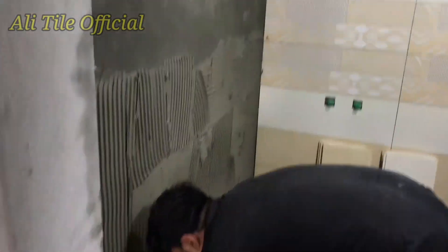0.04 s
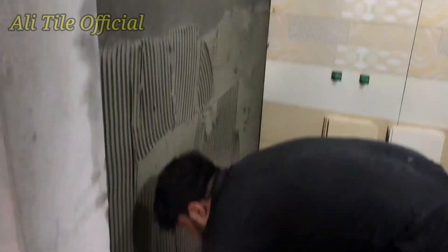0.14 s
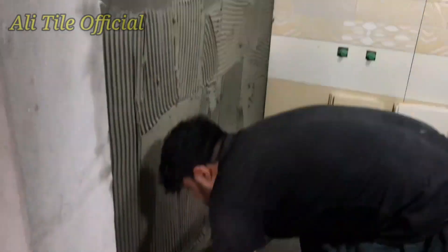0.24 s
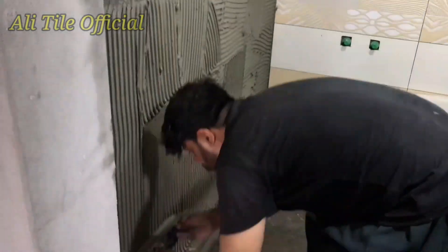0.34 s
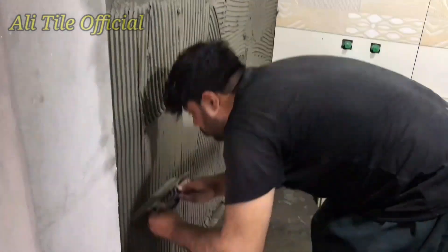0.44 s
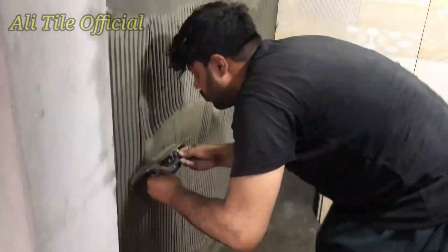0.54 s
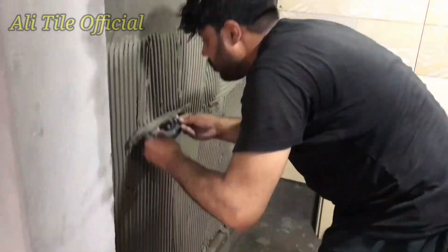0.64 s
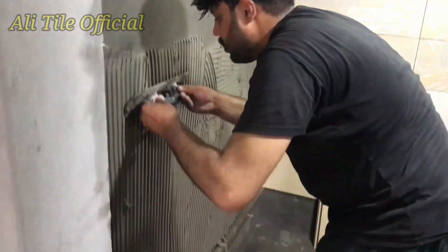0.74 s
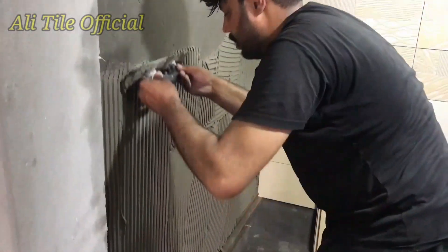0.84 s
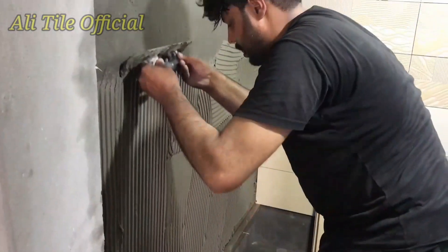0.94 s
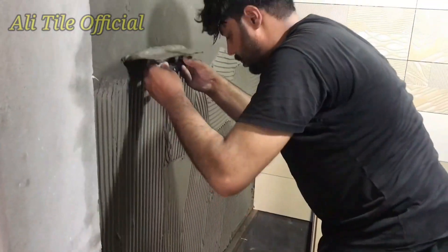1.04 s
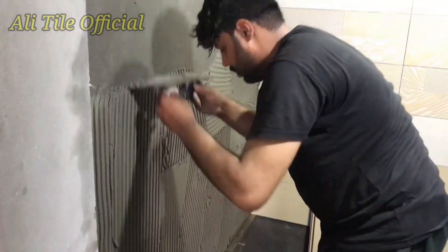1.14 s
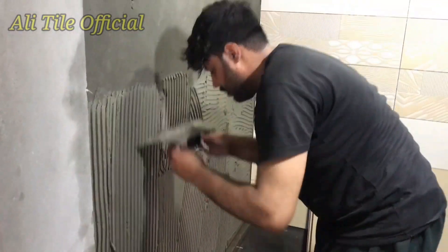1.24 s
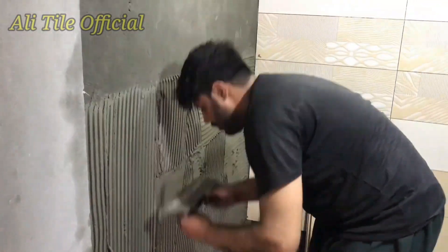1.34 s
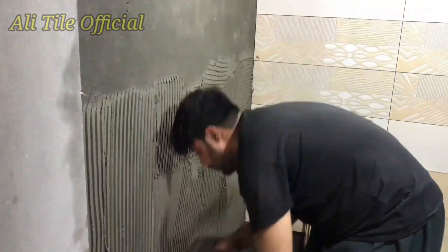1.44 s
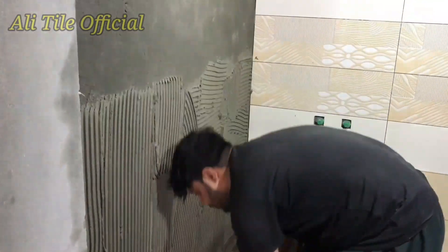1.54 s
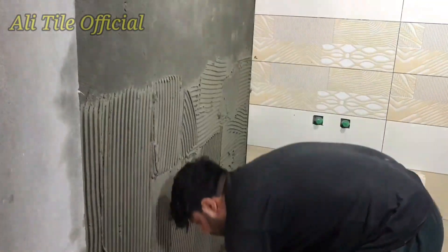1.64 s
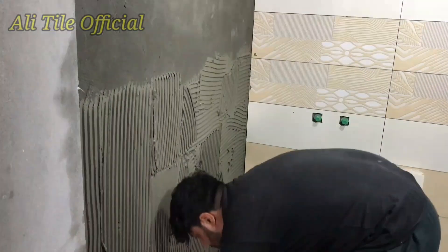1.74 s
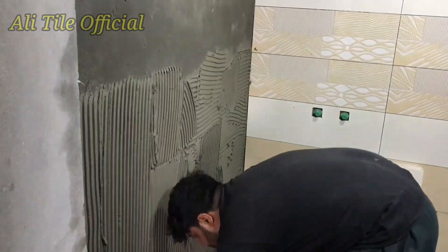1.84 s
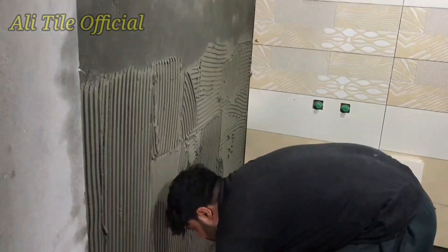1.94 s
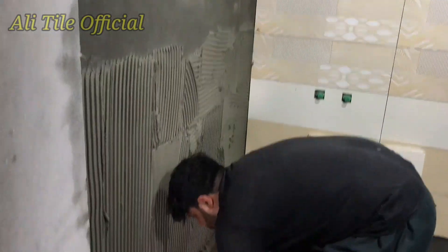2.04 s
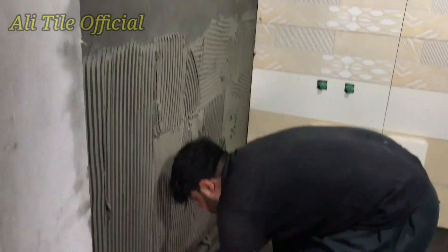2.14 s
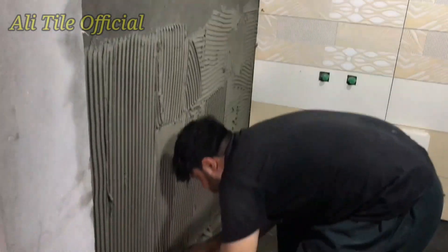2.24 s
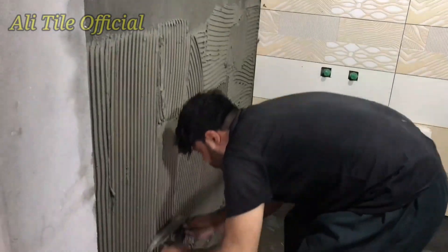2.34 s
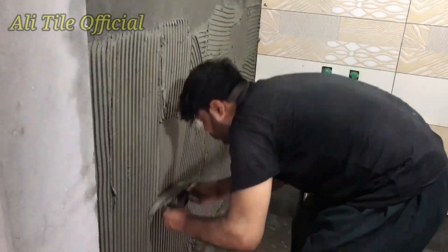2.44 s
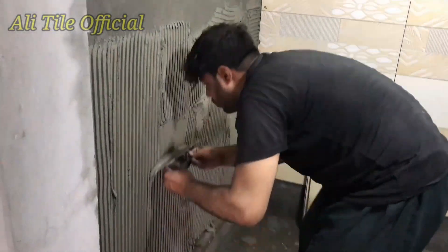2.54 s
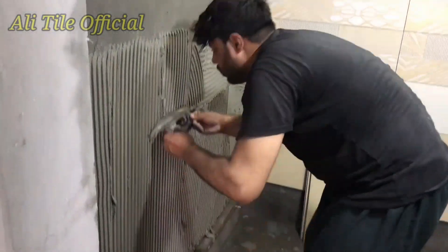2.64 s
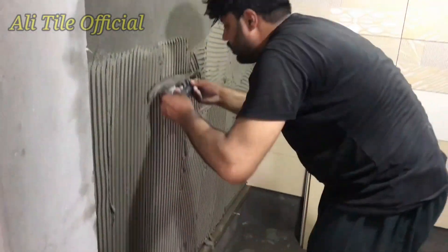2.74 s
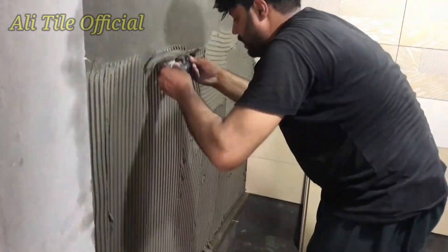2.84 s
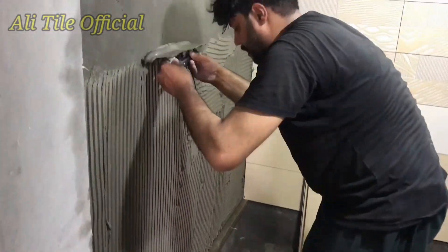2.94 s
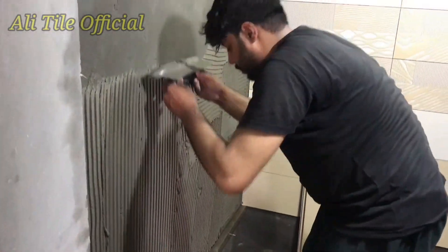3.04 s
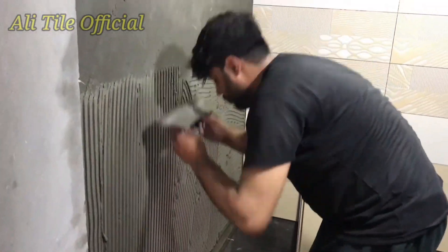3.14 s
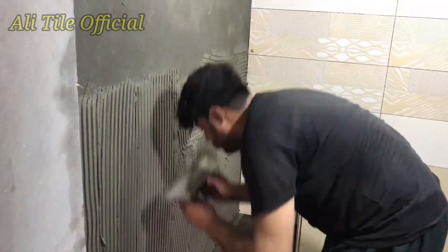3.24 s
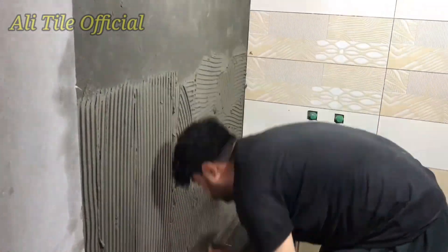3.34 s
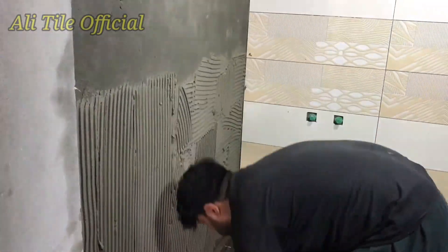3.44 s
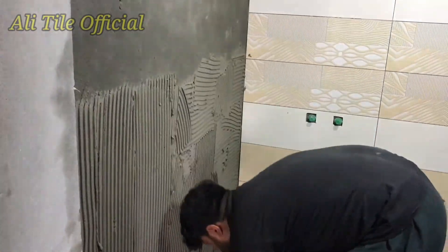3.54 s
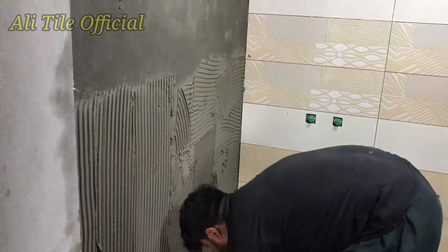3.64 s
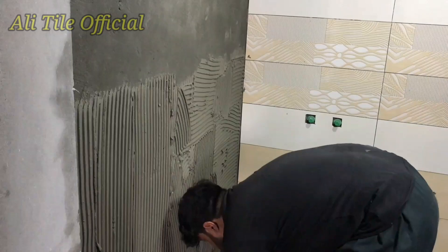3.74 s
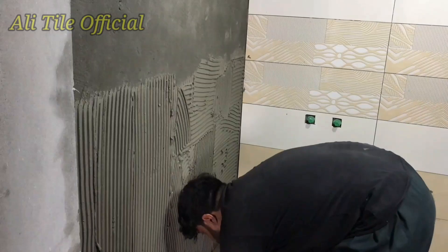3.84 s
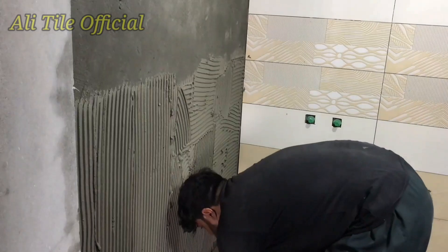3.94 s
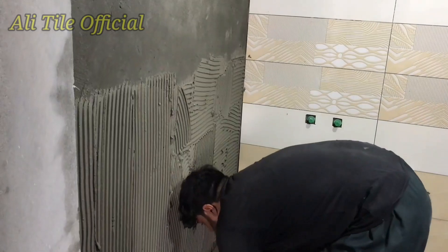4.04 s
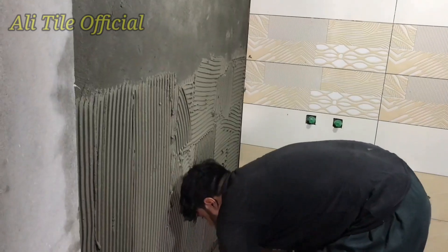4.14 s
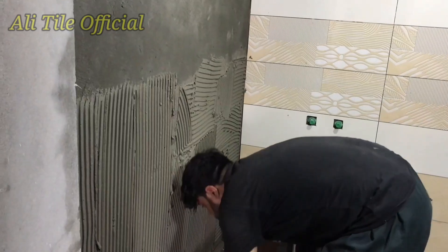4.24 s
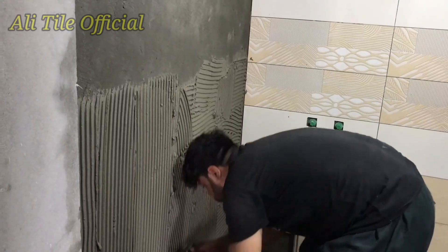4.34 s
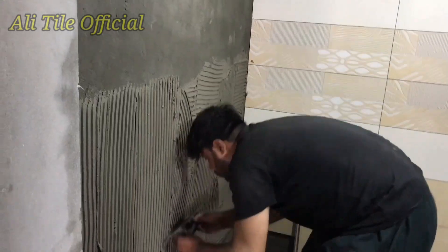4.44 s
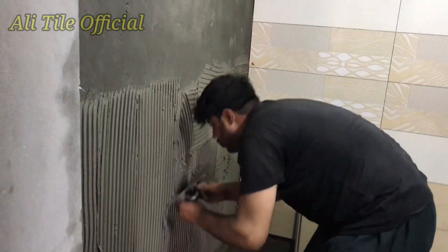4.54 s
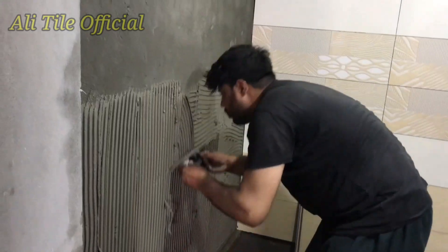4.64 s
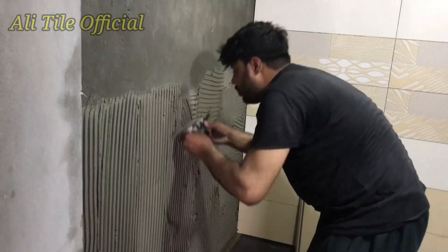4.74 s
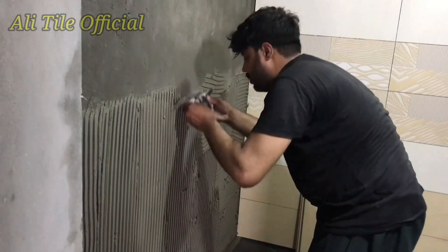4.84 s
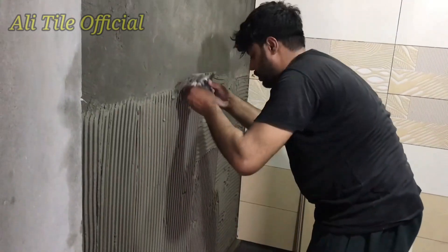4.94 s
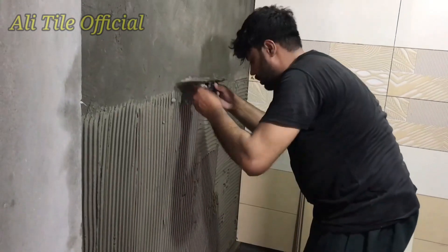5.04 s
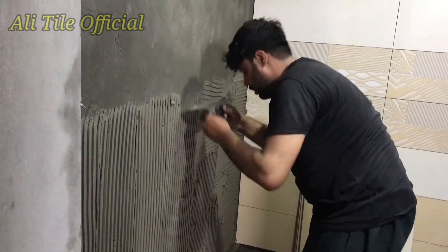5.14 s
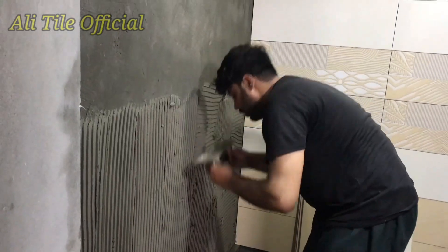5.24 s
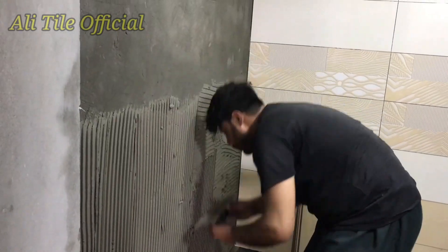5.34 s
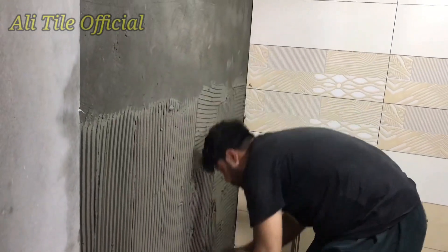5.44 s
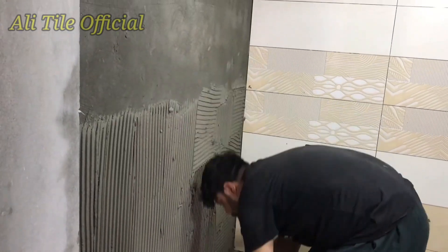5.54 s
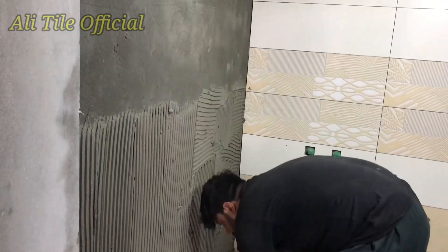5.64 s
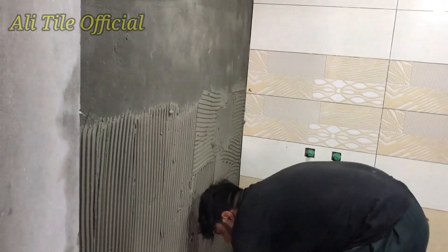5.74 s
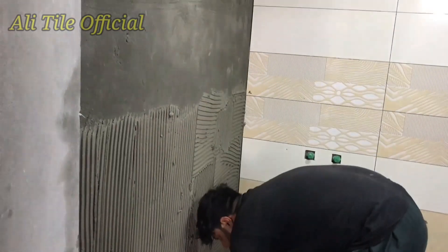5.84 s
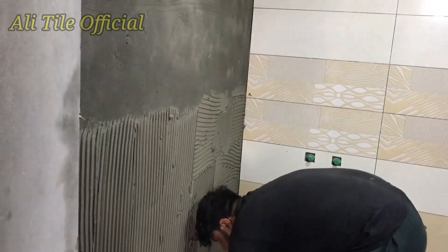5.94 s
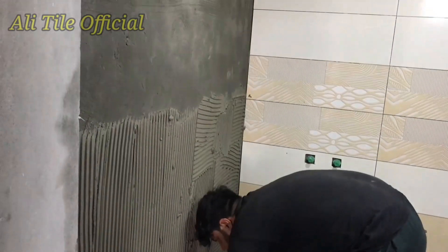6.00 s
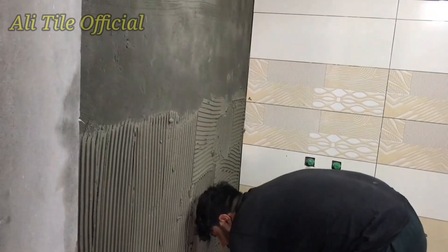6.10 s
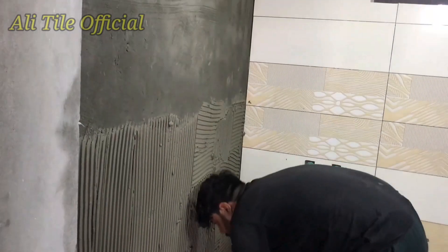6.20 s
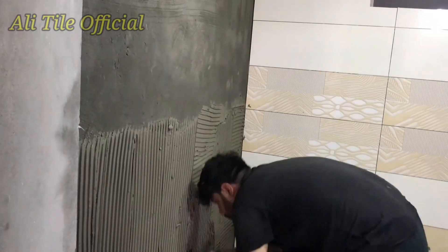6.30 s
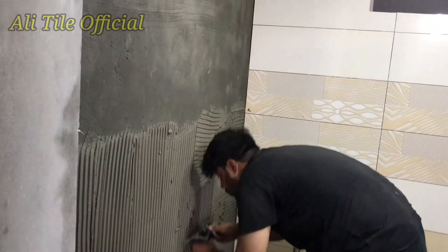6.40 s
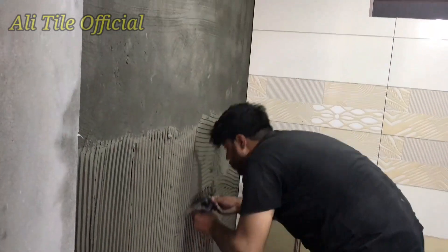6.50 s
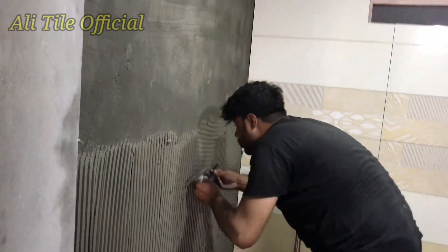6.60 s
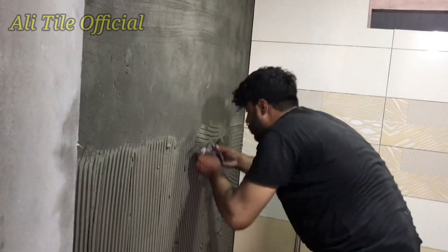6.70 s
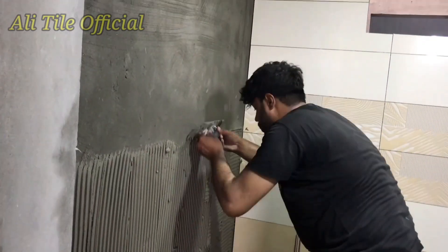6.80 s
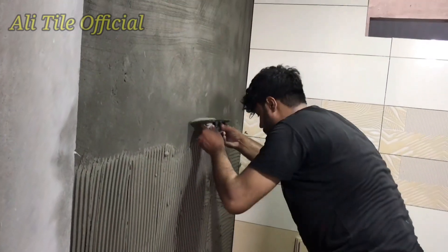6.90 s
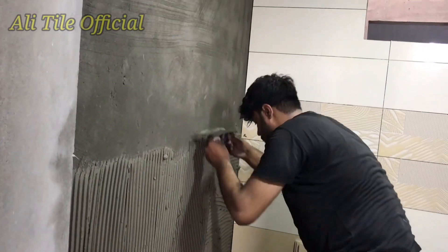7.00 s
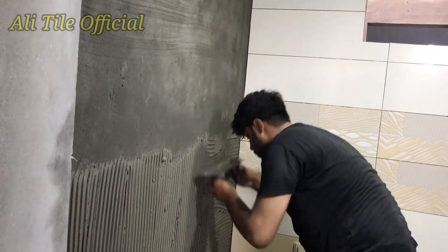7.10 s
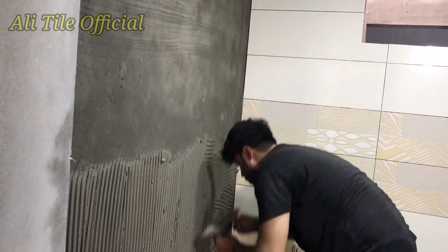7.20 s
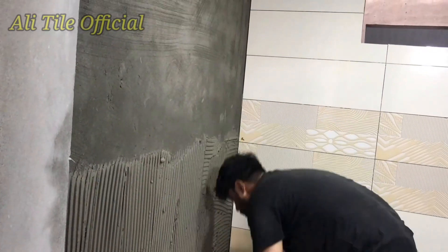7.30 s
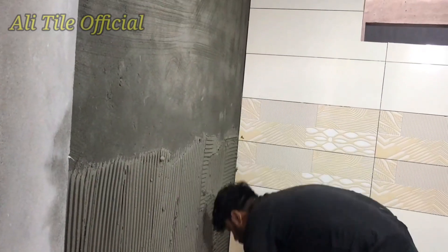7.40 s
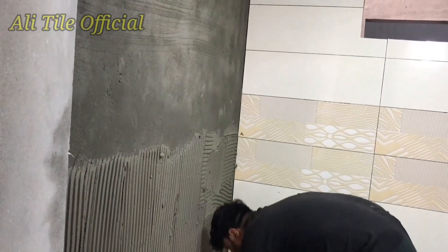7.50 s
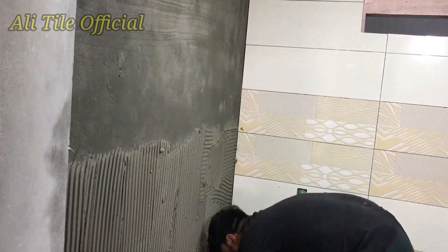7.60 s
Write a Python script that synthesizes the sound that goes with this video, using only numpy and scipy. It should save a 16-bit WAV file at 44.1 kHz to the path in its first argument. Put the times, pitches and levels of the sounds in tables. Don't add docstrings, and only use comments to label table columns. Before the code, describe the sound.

In a bare, echoing tiled bathroom, a notched steel trowel combs gritty adhesive up a cement wall in four strokes, each a damped rumble with sandy rasp and hiss. Between them the freed blade is scraped with a brief metallic ring, and steel and a hollow bucket are knocked, loudest midway. A low machine drone wavers through the walls behind faint room noise. One fairly close microphone, mono.

```python
import sys
import numpy as np
from scipy import signal
from scipy.fft import rfft, irfft, next_fast_len
from scipy.io import wavfile

SR = 44100
rng = np.random.default_rng(int(sys.argv[2]) if len(sys.argv) > 2 else 0)


def linear_from_db(decibels):
    return 10 ** (np.asarray(decibels, float) / 20)


def bounce(signal):
    frames = np.transpose(np.atleast_2d(signal))
    limited = np.clip(frames, -1, 1)
    pcm = np.round(limited * 32767).astype(np.int16)
    wavfile.write(sys.argv[1], SR, pcm)


N = 337805

# frequency [Hz], level [dB per Hz].
GRIT_SPECTRUM = [(150, -55), (250, -11.5), (318, -9.5), (481, -10.5), (680, 2), (943, -2.5), (1200, 0.5),
                 (2270, -4), (3440, -7.5), (4940, -13), (5970, -15.5), (7590, -18.5), (10400, -17.5),
                 (14400, -16.5), (15400, -30)]


def at_hz(points, hz):
    table_hz, values = np.array(points).T[:2]
    return np.interp(np.log(hz), np.log(table_hz), values)


def rms_one(x):
    return x / np.sqrt(np.mean(x ** 2) + 1e-20)


def in_time(rows):
    s, *columns = np.transpose(rows)
    return np.array([np.interp(np.arange(N) / SR, s, c) for c in columns])


def contact(tables, touch_s, lift_s, count):
    out, t = 0, np.arange(N) / SR
    for rows in tables:
        first_db, *rest_db = in_time(rows)[:count]
        touch = np.clip((t - rows[0][0]) / touch_s, 0, 1)
        lift = np.exp(-np.maximum(t - rows[-1][0], 0) / lift_s)
        levels_db = np.array([first_db] + [first_db + r for r in rest_db])
        out = out + touch * lift * linear_from_db(levels_db)
    return out


def band(x, low_hz, high_hz, order=2):
    edges_hz = [low_hz, min(high_hz, 0.49 * SR)]
    return signal.sosfilt(signal.butter(order, edges_hz, "band", fs=SR, output="sos"), x)


def coloured(x, spectrum):
    size = next_fast_len(len(x))
    hz = np.minimum(np.arange(size // 2 + 1) * SR / size + 1, 14500)
    shaped = rfft(x, size) * linear_from_db(at_hz(spectrum, hz))
    return rms_one(irfft(shaped, size)[:len(x)])


def resonance(x, hz, width_hz):
    r = np.exp(-np.pi * width_hz / SR)
    poles = [1, -2 * r * np.cos(2 * np.pi * hz / SR), r * r]
    return signal.lfilter([(1 - r * r) / 2, 0, (r * r - 1) / 2], poles, x)


def bending(x, hz, sharpness):
    out, state = np.zeros(N), np.zeros(2)
    for i in range(0, N, 256):
        r = np.exp(-np.pi * hz[i] / sharpness / SR)
        zeros = [(1 - r * r) / 2, 0, (r * r - 1) / 2]
        poles = [1, -2 * r * np.cos(2 * np.pi * hz[i] / SR), r * r]
        out[i:i + 256], state = signal.lfilter(zeros, poles, x[i:i + 256], zi=state)
    return rms_one(out)


def drift(rate_hz):
    slow = band(rng.standard_normal(N // 32 + 4000), 4 * rate_hz, 32 * rate_hz, order=1)[3998:]
    return np.interp(np.arange(N) / 32, np.arange(len(slow)), rms_one(slow))


def grit(per_s, spread_db, chatter_db):
    sizes = linear_from_db(spread_db * np.minimum(rng.exponential(1, N), 3.5)) * rng.choice([-1, 1], N)
    grains = sizes * (rng.random(N) < per_s / SR)
    return rms_one(grains * linear_from_db(chatter_db * drift(56)))


def other_teeth(grains):
    return grains * rng.choice([-1, 1], N)


def room_noise():
    # frequency [Hz], level [dB per Hz].
    floor_spectrum = [(20, -31), (35, -25), (60, -4.5), (147, 2), (193, -13.5), (245, -8.5), (300, -4),
                      (380, -13.5), (470, -22), (940, -15), (3240, -27), (7000, -40), (11000, -41.5),
                      (15000, -45)]
    return linear_from_db(-44) * coloured(rng.standard_normal(N), floor_spectrum)


def drone():
    # time [s], motor frequency [Hz], level [dB].
    motor_curve = [(0.0, 116, -55), (0.59, 128, -63), (1.09, 128.2, -45), (1.21, 125, -42),
                   (2.24, 123.8, -41.5), (2.39, 130.3, -69), (2.49, 126, -41.5), (3.43, 122.9, -43),
                   (4.16, 119.7, -33.5), (4.57, 121, -60), (4.84, 116, -39.5), (5.48, 113.2, -36.5),
                   (6.16, 109.6, -39), (6.25, 114, -45.5), (6.61, 113, -41), (7.15, 113, -55),
                   (7.3, 107.4, -42), (7.66, 109, -62.5)]
    rest_levels_db = [-59.5, -54.5, -53.5, -55.5]
    # centre [s], length [s], low line rise [dB], second line rise [dB].
    surges = [
        (0.0, .3, 14, 8),
        (0.95, .25, 5, 0),
        (2.42, 0.58, 15.5, 4),
        (3.35, .4, 16, 9),
        (3.894, .3, 10, 10),
        (4.2, .2, 9, 0),
        (4.46, 0.19, 3, 11),
        (4.73, 0.17, 14.5, 3),
        (5.01, .2, 12, 9),
        (5.6, .4, 2, 12),
    ]
    lines = []
    for hz in (49, 92):
        phase = 2 * np.pi * np.cumsum(hz + 2.5 * drift(3)) / SR
        lines.append(np.sqrt(2) * np.sin(phase))
    for hz, width_hz in ((145, 22), (314, 35)):
        hum = resonance(rng.standard_normal(N), hz, width_hz)
        lines.append(rms_one(resonance(hum, hz, width_hz)))
    levels_db = np.array([rest_db + drift(4.3) for rest_db in rest_levels_db])
    for s, length_s, *rise_db in surges:
        swell = np.exp(-((np.arange(N) / SR - s) / length_s) ** 2)
        levels_db[:2] += np.outer(rise_db, swell)
    motor_hz, motor_db = in_time(motor_curve)
    motor_gain = linear_from_db(motor_db + 0.5 + 3 * drift(7))
    motor = motor_gain * np.sin(2 * np.pi * np.cumsum(motor_hz + 1.5 * drift(4)) / SR)
    return np.sum(linear_from_db(levels_db) * lines, axis=0) + motor


def insect():
    # start [s], length [s], level [dB].
    calls = [
        (1.66, 0.28, -68),
        (3.68, 0.25, -66),
        (5.5, 0.36, -67),
    ]
    spans = [[(s, db), (s + length_s, db)] for s, length_s, db in calls]
    level, = contact(spans, touch_s=0.05, lift_s=0.02, count=1)
    trill = resonance(resonance(rng.standard_normal(N), 10080, 280), 10080, 280)
    return level * linear_from_db(2.2 * drift(40)) * rms_one(trill)


def bathroom(x):
    # frequency [Hz], decay time to -60 dB [s].
    room_t60 = [(300, 2.7), (700, 1.53), (1500, 1.33), (3000, 0.94), (6000, 0.84), (12000, 0.1)]
    t, edges_hz = np.arange(2 * SR) / SR, 180 * 2 ** np.arange(0, 7, 0.5)
    white, echo = rng.standard_normal((2, 2, len(t))), 0
    for k, (low_hz, high_hz) in enumerate(zip(edges_hz, edges_hz[1:])):
        t60_s = at_hz(room_t60, np.sqrt(low_hz * high_hz))
        echo = echo + band(white[k % 2], low_hz, high_hz) * linear_from_db(-60 * t / t60_s)
    echo *= np.clip(t / 0.0015, 0, 1)
    shifts_per_s = 0.45
    turn = 2 * np.pi * shifts_per_s * np.arange(N) / SR
    sent = x * np.array([np.cos(turn), np.sin(turn)])
    return signal.fftconvolve(sent, linear_from_db(-39) * echo, axes=1).sum(axis=0)[:N]


def knocks():
    # time [s], peak [dB], thud [dB re peak], clack [dB re peak].
    hits_table = [(0.331, -22.5, -4.5, -12), (0.7241, -15, -16, 0.5), (1.5183, -35, -3, 9),
                  (1.8899, -28, -28, -29), (2.1791, -27, -28, -16), (2.3186, -21, -9, -2),
                  (2.44, -15, -27, -13), (2.7638, -19, -3, -18), (3.2825, -33, 3, -15),
                  (3.5989, -7, -7, -21), (3.9908, -13.5, -7.5, 4.5), (4.3285, -25, -6, -3),
                  (5.4157, -28, -25, -12), (6.0999, -25, -5, -26), (6.1412, -25, -16, 7.5),
                  (6.2771, -28, -17, 9), (7.2532, -23, -28, -11)]
    # frequency [Hz], level [dB], decay time to -60 dB [s].
    bucket_modes = [(336, -5, 0.55), (310, -5, 0.18), (550, -12, 0.1312), (782, -15, 0.26)]
    s, peak_db, thud_db, clack_db = np.transpose(hits_table)
    at = np.round(s * SR).astype(int)
    ticks, pushes, clacks = np.zeros((3, N)) + 1e-18
    ticks[at] = linear_from_db(peak_db)
    pushes[at] = ticks[at] * linear_from_db(thud_db)
    clacks[at] = ticks[at] * linear_from_db(clack_db)
    out = np.zeros(N)
    for hits, last_s, low_hz, high_hz, db in ((ticks, 0.003, 3000, 15000, -7),
                                              (clacks, 0.012, 550, 2500, 1.5),
                                              (pushes, 0.04, 250, 600, 3)):
        dying = signal.lfilter([1], [1, -np.exp(-1 / (last_s * SR))], hits)
        out += linear_from_db(db) * band(dying * rng.standard_normal(N), low_hz, high_hz)
    for hz, db, t60_s in bucket_modes:
        r, w = linear_from_db(-60 / (t60_s * SR)), 2 * np.pi * hz / SR
        out += linear_from_db(db - 11) * signal.lfilter([0, np.sin(w)], [1, -2 * r * np.cos(w), r * r], pushes)
    return out


def free_scrapes():
    # time [s], edge hiss [dB], ring [dB re hiss].
    scrapes = [
        [(0.037, -35, -0.5), (0.067, -43, 9.5), (0.137, -55, 7), (0.165, -51, -5)],
        [(1.884, -25.5, 0), (1.894, -27, 3.5), (1.936, -33, 9), (1.974, -33.5, 10.5), (2.034, -44.5, 7),
         (2.16, -50, 14)],
        [(3.978, -48, 15), (3.992, -21.5, -1), (4.006, -20.5, 7.5), (4.05, -21.5, 3.5), (4.088, -38, 13),
         (4.148, -43, 11), (4.3, -39, 13.5)],
        [(5.855, -28.5, 2.5), (5.905, -32.5, 9), (6.055, -47.5, 14), (6.1, -50.5, 18), (6.26, -42.5, 11)],
    ]
    # frequency [Hz], width [Hz], level [dB].
    blade_modes = [
        [(1200, 63, 11.5), (1510, 82, 12.5), (1660, 44, 6), (2140, 24, 5), (2440, 30, -24), (3370, 55, -20)],
        [(1140, 27, 2), (1520, 33, 0.5), (1720, 34, 5.5), (2620, 33, -15), (2880, 44, 1), (4080, 130, -23),
         (4380, 54, -6)],
        [(607, 9.2, -6), (860, 7.4, -0.5), (1150, 60, 5), (1610, 75, 5.5), (2130, 19, -4), (2550, 16, -22),
         (2690, 71, -2.5), (4050, 26, -7)],
        [(1167, 130, 3), (1610, 57, 11.5), (1788, 28, 0), (2680, 69, -8), (3050, 20, -32), (2280, 56, -3),
         (4270, 61, -15)],
    ]
    # frequency [Hz], width [Hz], level [dB].
    body_modes = [(390, 20, -6), (561, 16, 0.5), (847, 4.3, -5)]
    grains = grit(9000, spread_db=1.5, chatter_db=-2.6)
    sound = coloured(other_teeth(grains), GRIT_SPECTRUM)
    rasping = coloured(other_teeth(grains), GRIT_SPECTRUM)
    top = rms_one(band(sound, 5000, 17000, order=3))
    low = rms_one(band(sound, 700, 2300, order=3))
    high = rms_one(band(rasping, 2300, 5000, order=3))
    out = np.zeros(N)
    for rows, modes in zip(scrapes, blade_modes):
        since_s = np.clip(np.arange(N) / SR - rows[0][0], 0, 1)
        hiss, low_gain = contact([rows], touch_s=0.00029, lift_s=0.13, count=2)
        high_gain = low_gain * linear_from_db(4.5 - 42 * since_s)
        out += linear_from_db(-1) * hiss * top + linear_from_db(-10.5) * low_gain * low + linear_from_db(-8) * high_gain * high
        damping_db = -30 * since_s
        for hz, width_hz, db in modes + body_modes:
            gain = low_gain if hz < 2300 else high_gain
            level_db = db + 9 + damping_db * min(hz / 1000, 2) + 1.5 * drift(24)
            loaded_width_hz = width_hz + hz / 25
            out += resonance(grains * gain * linear_from_db(level_db), hz, loaded_width_hz)
    return out


def blade_motion():
    # time [s], speed as edge hiss [dB], weight on the blade [dB].
    strokes = [
        [(0.175, -42.5, 6.5), (0.285, -42.5, 9), (0.43, -35, 4), (0.543, -26.5, 6.5), (0.697, -40.5, 10),
         (0.825, -33.5, 7), (0.93, -29.5, 0), (1.04, -30, 10.5), (1.093, -46, 9.5)],
        [(2.441, -35.5, 20.5), (2.464, -30, 1.5), (2.598, -25, 7.5), (2.634, -28, 8.5), (2.684, -37, 9),
         (2.754, -40, 10), (2.766, -29.5, 2.5), (2.936, -29.5, 9.5), (3.086, -52.5, 9.5)],
        [(4.372, -45, 10), (4.414, -27, 6), (4.558, -22, 4.5), (4.714, -32, 6), (4.816, -25.5, 9),
         (4.906, -28.5, 0), (5.048, -28, 9), (5.108, -41, 19.5), (5.22, -61, 8)],
        [(6.27, -35.5, -3), (6.302, -35.5, 8), (6.374, -23.5, 4.5), (6.428, -24, 4.5), (6.51, -30, 7),
         (6.786, -24.5, 5.5), (6.876, -29, 4.5), (6.93, -24.5, 5.5), (7.06, -48, 18.5)],
    ]
    # peak [s], hiss [dB], weight [dB], rise [s], fade [s].
    touches = [(0.237, -51, -3, 0.049, 0.02), (0.731, -55, -6, 0.015, 0.044),
               (1.4, -38.5, 0.5, 0.052, 0.046), (1.519, -41, 10.5, 0.0085, 0.037),
               (2.18, -35, -3.5, 0.01, .03), (2.354, -43.5, 5, 0.18, 0.19),
               (2.434, -39.5, 6.5, 0.046, 0.012), (3.292, -50, 4, 0.052, 0.099),
               (3.536, -55, -22, 0.078, 0.067), (3.6, -30, 4.5, 0.024, 0.042), (3.75, -58, 2, 0.031, 0.14),
               (4.325, -31.5, 0, 0.007, 0.06), (5.307, -48.5, 14.5, 0.24, 0.12),
               (5.425, -35.5, 0, .012, 0.044), (6.099, -38.5, 6, .03, .03), (6.147, -45, 0, .012, .05),
               (1.56, -58, 10, 0.038, 0.062), (5.55, -69, 20, .05, 0.23), (4.285, -43, 3, .05, 0.049),
               (7.166, -48.5, 11, .09, .05), (7.256, -47, 8, .006, 0.057)]
    rasp_share = 0.38
    edge, loaded = contact(strokes, touch_s=0.0026, lift_s=0.16, count=2)
    t, teeth = np.arange(N) / SR, 0
    for s, db, weight_db, rise_s, fade_s in touches:
        rise = linear_from_db(db) * np.clip(1 + (t - s) / rise_s, 0, 1) ** 2
        after = np.maximum(t - s, 0) / fade_s
        brush = rise * np.exp(-after)
        edge = edge + brush
        loaded = loaded + linear_from_db(weight_db) * brush
        teeth = teeth + linear_from_db(-9.5 + rasp_share * weight_db) * rise * np.exp(-after / 1.16)
    linger_s = 0.41
    r = np.exp(-1 / (linger_s * SR))
    loaded = loaded + linear_from_db(-29) * signal.lfilter([1 - r], [1, -r], loaded)
    rasp = teeth + linear_from_db(1) * edge ** (1 - rasp_share) * loaded ** rasp_share
    return edge, loaded, rasp


def wall_strokes():
    # time [s], resonance [Hz].
    flex = [(0.2, 1080), (0.55, 900), (0.93, 1000), (1.05, 760), (1.5, 1509), (2.2, 1380), (2.44, 704),
            (2.53, 900), (3.0, 800), (3.6, 938), (4.4, 1240), (4.7, 1286), (5.05, 926), (6.3, 1080),
            (6.43, 1220), (6.8, 1049), (7.1, 940)]
    # frequency [Hz], width [Hz], level [dB].
    wall_modes = [(620, 66, -6), (697.4, 45, -3.5), (893, 90, 1), (1181, 18, -12)]
    hiss, rumble, rasp = blade_motion()
    grains = grit(9000, spread_db=1, chatter_db=0.56)
    sound = coloured(grains, GRIT_SPECTRUM)
    rasping = coloured(other_teeth(grains), GRIT_SPECTRUM)
    plate_hz, = in_time(flex)
    stiff = linear_from_db(7 * np.log2(plate_hz / 1000))
    flexing = sound + linear_from_db(-1) * bending(sound, plate_hz, sharpness=3)
    for hz, width_hz, db in wall_modes:
        flexing = flexing + linear_from_db(db - 4) * resonance(sound / stiff ** 2, hz, width_hz)
    low = rms_one(band(flexing, 150, 1700, order=3))
    middle = rms_one(band(rasping, 1600, 5000, order=3))
    top = rms_one(band(sound, 5000, 17000, order=3))
    out = linear_from_db(0.5) * hiss * top
    out += linear_from_db(-4 + 1.2 * drift(38)) * rumble * low
    out += linear_from_db(-3 + 1.6 * drift(34)) * rasp * np.sqrt(stiff) * middle
    return out


def scene():
    work = wall_strokes() + free_scrapes() + knocks()
    behind = drone() + insect() + room_noise()
    return np.tile(work + bathroom(work) + behind, (2, 1))


def band_limit(x):
    return signal.sosfilt(signal.butter(12, 16800, fs=SR, output="sos"), x)


def record(dry):
    # dip frequency [Hz], width [Hz], depth [0-1].
    notches = [(4910, 380, 0.37), (7690, 720, 0.26), (10420, 810, 0.45)]
    for hz, width_hz, depth in notches:
        dry = dry - np.clip(depth, 0, 1) * resonance(dry, hz, width_hz)
    dry = 0.85 * np.tanh(dry / 0.85)
    dry = signal.sosfilt(signal.ellip(10, 0.5, 45, 15500, fs=SR, output="sos"), dry)
    return band_limit(dry)


dry = scene()
out = record(dry)
bounce(out)
```